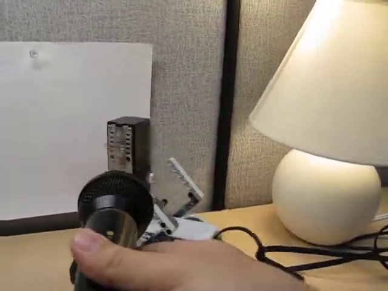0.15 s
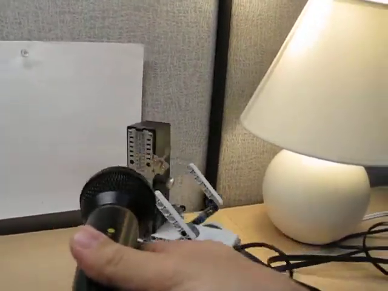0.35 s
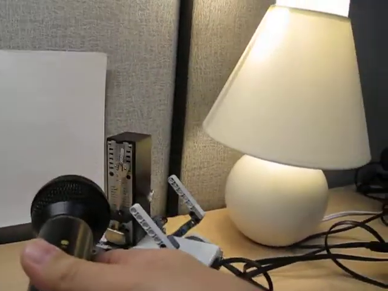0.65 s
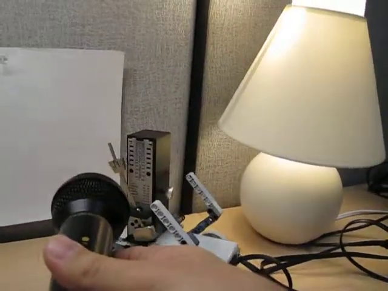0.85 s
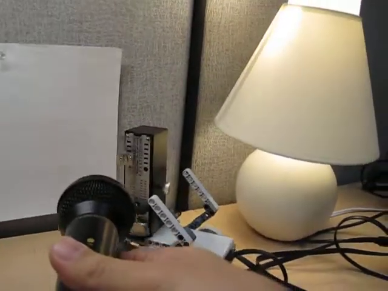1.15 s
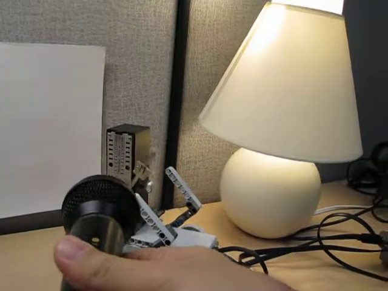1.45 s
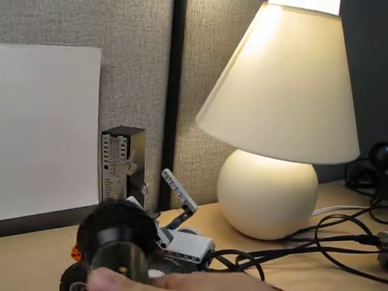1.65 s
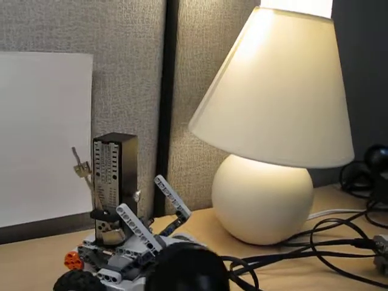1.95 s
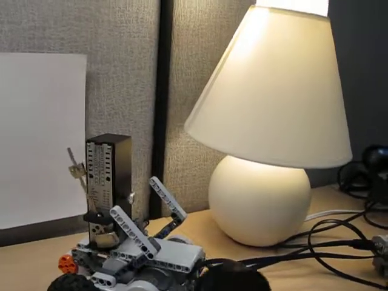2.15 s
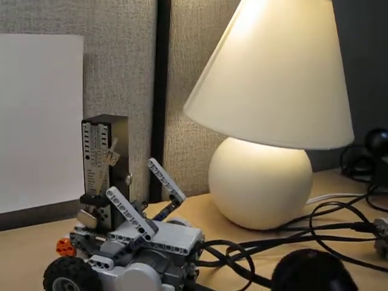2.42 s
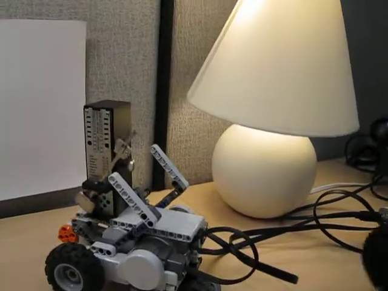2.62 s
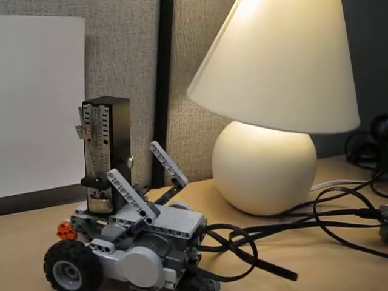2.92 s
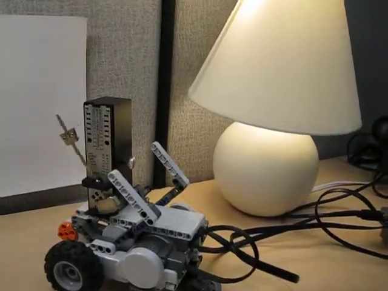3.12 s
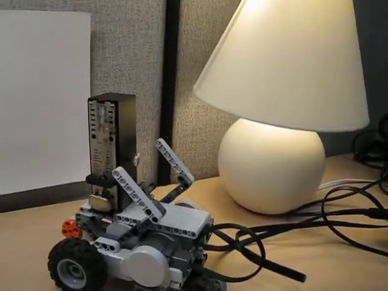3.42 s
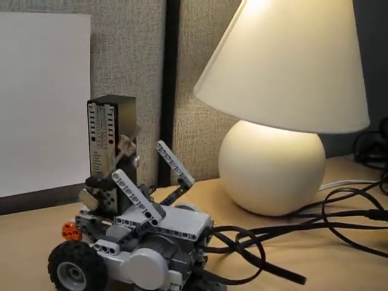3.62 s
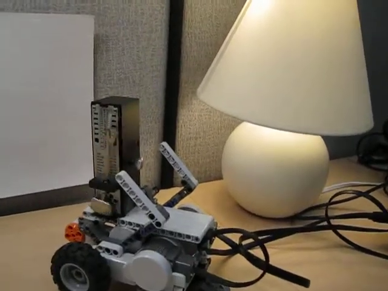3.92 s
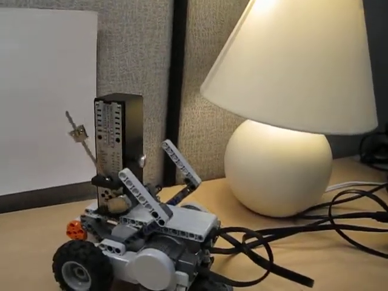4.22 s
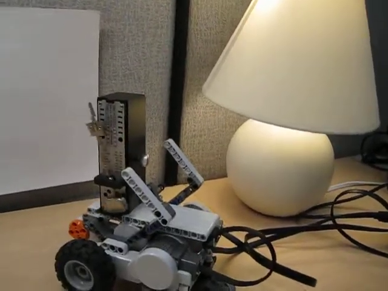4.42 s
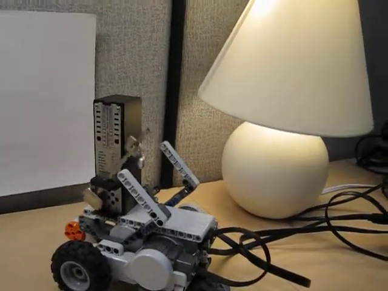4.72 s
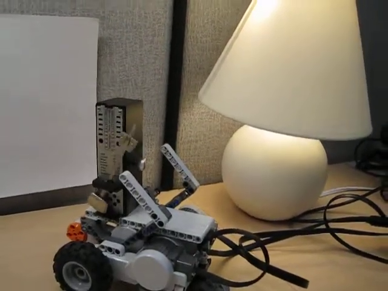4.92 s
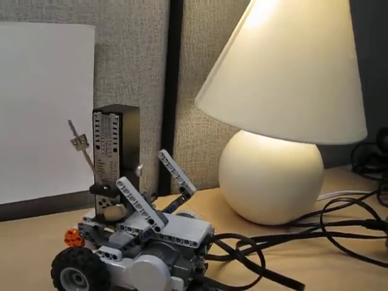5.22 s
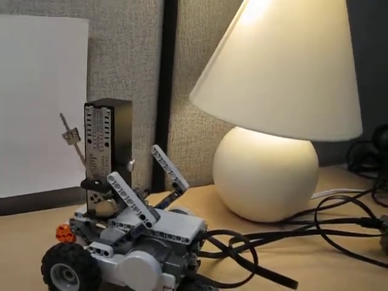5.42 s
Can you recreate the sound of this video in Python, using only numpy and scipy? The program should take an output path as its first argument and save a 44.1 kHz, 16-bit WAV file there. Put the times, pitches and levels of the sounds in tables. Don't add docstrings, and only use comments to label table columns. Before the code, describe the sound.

Small geared motors rattle harshly, slow and stop within a second, while a clockwork metronome keeps clicking evenly in a quiet office.

```python
import sys
import numpy as np
from scipy import signal
from scipy.fft import rfft, irfft
from scipy.io import wavfile
from scipy.ndimage import uniform_filter1d

SR = 44100
rng = np.random.default_rng(int(sys.argv[2]) if len(sys.argv) > 2 else 0)


def to_wav(sig):
    pcm = np.clip(np.atleast_2d(sig), -1, 1) * 32767
    pcm = np.round(pcm).astype(np.int16)
    wavfile.write(sys.argv[1], SR, pcm.T)


def convert_level_to_amplitude(level_db):
    exponent = np.asarray(level_db, float) / 20
    return 10 ** exponent


N = 245195


def evened(x):
    return x / np.sqrt(np.mean(x ** 2) + 1e-20)


def read(points, hz):
    f, value = np.transpose(points)
    return np.interp(np.log(hz + 1), np.log(f + 1), value)


def add(mix, s, sound):
    part = mix[round(s * SR):][:len(sound)]
    part += sound[:len(part)]


def coloured(x, points):
    gain = convert_level_to_amplitude(read(points, np.fft.rfftfreq(len(x), 1 / SR)))
    return irfft(rfft(x) * gain, len(x))


def resonate(x, hz, width):
    turn = np.exp(2j * np.pi * np.cumsum(hz * np.ones(len(x))) / SR)
    pole = np.exp(-np.pi * width / SR)
    return 2 * (turn * signal.lfilter([1 - pole], [1, -pole], x / turn)).real


def drift(size, smooth_s):
    span = max(round(smooth_s * SR), 1)
    once = uniform_filter1d(rng.standard_normal(size), span)
    return evened(uniform_filter1d(once, span))


# f/Hz, level/dB, t60/s, side of the wall (+-1)
CASE_MODES = [(847, -38.3, 0.0111, -1), (1160, -34.0, 0.0423, 1), (1268, -20.9, 0.0321, -1),
              (1357, -30.8, 0.0386, 1), (2030, -25.7, 0.0294, -1), (2170, -19.0, 0.0077, 1),
              (2403, -32.8, 0.0303, 1), (2472, -14.6, 0.014, 1), (2810, -16.8, 0.0094, 1),
              (3106, -17.4, 0.0122, -1), (3238, -20.4, 0.0111, -1), (3620, -11.2, 0.0068, -1),
              (3905, -27.3, 0.0203, -1), (4053, -27.0, 0.0084, 1), (4630, -34.0, 0.0328, 1),
              (4755, -22.7, 0.0174, -1), (5044, -32.9, 0.0309, 1), (5171, -26.3, 0.0127, 1),
              (5357, -12.1, 0.0108, 1), (5616, -21.7, 0.0111, -1), (5943, -17.8, 0.0088, -1),
              (6303, -23.3, 0.0063, 1), (7177, -24.0, 0.0119, 1), (8394, -35.6, 0.0185, -1),
              (9034, -23.3, 0.0072, 1), (9671, -33.3, 0.0111, 1), (11247, -39.1, 0.0125, 1),
              (12432, -39.2, 0.012, -1), (13630, -33.4, 0.0055, -1)]
# f/Hz, spectral level/dB per Hz
STEEL_SPECTRUM = [(700, -28), (1500, -20), (2200, -10), (5000, -3.5), (7000, -8), (10000, -11),
                  (13000, -15), (16000, -26.5)]
# f/Hz, spectral level/dB per Hz
SCATTER_SPECTRUM = [(600, -39), (1100, -16), (1290, 1), (1470, -12.5), (1800, -22.5), (2080, -3),
                    (2500, -7.5), (4300, -12), (5400, -13), (9000, -26.5), (16000, -41)]


def tick(strength_db, chatter_db, deck_db):
    t = np.arange(8000) / SR
    contact_s = .00048
    ring = sum(side * convert_level_to_amplitude(db - 60 * t / t60) * np.sin(2 * np.pi * hz * t)
               for hz, db, t60, side in CASE_MODES)
    ring = ring * (1 - np.exp(-t / contact_s))
    noise = rng.standard_normal((3, len(t)))
    rebounds = coloured(noise[0], [(1400, -9), (1900, 0)])
    rebounds = rebounds * (1 - np.exp(-t / .003)) * convert_level_to_amplitude(-60 * t / .022)
    wobble = signal.fftconvolve(rebounds, ring)[:len(t)] * convert_level_to_amplitude(-23.5)
    edge = evened(coloured(noise[1], STEEL_SPECTRUM))
    edge = edge * (1 - np.exp(-t / 0.00033)) * convert_level_to_amplitude(-26 - 60 * t / 0.034)
    two_decays = convert_level_to_amplitude(-36.0 - 60 * t / .09) + convert_level_to_amplitude(-59.5 - 60 * t / 0.22)
    scatter = evened(coloured(noise[2], SCATTER_SPECTRUM)) * (1 - np.exp(-t / 0.0019)) * two_decays
    plate_hz, plate_t60 = 2045, .055
    deck = -convert_level_to_amplitude(deck_db - 60 * t / plate_t60) * np.sin(2 * np.pi * plate_hz * t)
    deck = deck * (1 - np.exp(-t / 0.0049))
    return deck + convert_level_to_amplitude(strength_db) * (ring + scatter) + convert_level_to_amplitude(chatter_db) * (wobble + edge)


# t/s, strength level/dB, chatter level/dB, deck ring level/dB
STRIKES = [
    (0.2507, 0, -1.5, -42),
    (0.8033, 0.5, 1, -31.5),
    (1.3114, 1, -1, -38),
    (1.8905, 1, 0, -41),
    (2.3978, 0.5, 2, -45),
    (2.976, 0, 0.5, -40.5),
    (3.489, 0.5, -0.5, -38),
    (4.0644, 0.5, -1, -37.5),
    (4.5816, 0, 0.5, -36.5),
    (5.155, 0, 1, -24),
]


def metronome(mix):
    for s, *strike in STRIKES:
        add(mix, s, tick(*strike))


def gear_drive(speed):
    size = len(speed)
    teeth_per_s = 420 * speed
    loose = np.interp(speed, (.3, .8), (.3, .8))
    turns = np.cumsum(teeth_per_s * (1 + .2 * drift(size, smooth_s=0.0049))) / SR
    since = (turns % 1) / teeth_per_s
    tooth = (1 - np.exp(-since / 0.00022)) * np.exp(-since / 0.0014)
    tooth = tooth * convert_level_to_amplitude(3.8 * drift(size, smooth_s=0.0099))
    struck = rng.random(size) < 6000 / SR
    grit = convert_level_to_amplitude(2.1 * np.minimum(rng.exponential(1, size), 4)) * struck
    force = (1 - loose) * evened(tooth) + loose * evened(grit + 0.69)
    drive = rng.standard_normal(size) * force
    return drive / np.sqrt(uniform_filter1d(drive ** 2, 1500))


def housing(drive, peaks):
    rung = 0
    for hz, width, db in peaks:
        lean = convert_level_to_amplitude(db + 2.8 * drift(len(drive), smooth_s=0.011))
        rung = rung + lean * resonate(drive, hz, 0.33 * width + 70)
    return evened(rung)


# t/s, peak level/dB, ringing f/Hz
SLACK_JOLTS = [
    (.011, -20.5, 1560),
    (.033, -35, 2560),
    (.034, -47, 740),
    (0.046, -28, 1246),
    (0.09, -23, 2400),
    (.127, -33, 729),
]


def jolts(out):
    t = np.arange(1200) / SR
    for s, peak_db, hz in SLACK_JOLTS:
        ring = convert_level_to_amplitude(peak_db - 60 * t / 0.029) * np.sin(2 * np.pi * hz * t)
        add(out, s, ring * (1 - np.exp(-t / 0.0024)))


# t/s, level/dB
GEAR_LOAD = [(0, -37), (.045, -31.5), (.082, -42), (.096, -35), (.14, -36.5), (.31, -41), (.43, -40.5),
             (.525, -47), (.63, -65.5)]
# f/Hz, width/Hz, level/dB
PULLING_PEAKS = [(1560, 92, -11), (2528, 100, 1), (3980, 160, -3), (4284, 92, 7.5), (4690, 31, -15),
                 (6250, 410, -5), (8150, 45, -15.5), (8920, 29, -16), (10450, 180, 0), (11400, 92, -17.5)]
# f/Hz, width/Hz, level/dB
BRAKING_PEAKS = [(2400, 24, -6), (2874, 43, -3), (4190, 51, -1.5), (4560, 47, -1), (4820, 96, 4),
                 (5790, 53, -7), (6250, 120, 0.5), (6920, 48, 0.5), (9780, 130, -18), (10280, 230, -4)]
# f/Hz, width/Hz, level/dB
COASTING_PEAKS = [(1500, 54, 3.5), (2080, 74, -7.5), (2670, 180, -8), (2990, 70, -11), (4010, 120, -1),
                  (4356, 70, 2.5), (5450, 78, -11), (6320, 130, -7.5), (6970, 220, -44), (9730, 300, -12)]
# f/Hz, spectral level/dB per Hz
SHELL_SPECTRUM = [(400, -44), (720, -4), (1060, -26.5), (1490, 2), (1750, -7.5), (2500, -9), (3400, -5.5),
                  (4300, -5.5), (7200, -8.5), (8800, -11.5), (10300, -7), (11100, -24), (12700, -29),
                  (15800, -31)]
# chassis level/dB, wheel frame level/dB, bearing hiss level/dB
PART_LEVELS = [
    (-9, -4, -8),
    (-6.5, -6, -6.5),
    (-9.5, -5, -8),
]


def motors():
    t = np.arange(round(.7 * SR)) / SR
    gearbox_db = np.interp(t, *np.transpose(GEAR_LOAD))
    standstill_s = .68
    speed = np.maximum(1 - (t / standstill_s) ** 2.5, .1)
    stage = np.interp(t, (.075, .095, .23, .33), (0, 1, 1, 2))
    drive = gear_drive(speed)
    rung = 0
    for k, peaks in enumerate((PULLING_PEAKS, BRAKING_PEAKS, COASTING_PEAKS)):
        share = np.clip(1 - abs(stage - k), 0, 1)
        rung = rung + np.sqrt(share) * housing(drive, peaks)
    whole = rung + convert_level_to_amplitude(-3) * evened(coloured(drive, SHELL_SPECTRUM))
    below = [coloured(whole, [(.95 * hz, 0), (1.15 * hz, -40)]) for hz in (1900, 3400, 8300)]
    chassis, frame, gearbox, hiss = map(evened, np.diff([0 * t, *below, whole], axis=0))
    out = gearbox
    for part, stage_db, rest_db in zip((chassis, frame, hiss), np.transpose(PART_LEVELS), (10, 2, -11)):
        part_db = np.interp(stage, np.arange(3), stage_db) + rest_db * (1 - speed) ** 2
        out = out + convert_level_to_amplitude(part_db) * part
    out = convert_level_to_amplitude(gearbox_db) * out
    jolts(out)
    out = coloured(out, [(700, -6), (1000, -1), (1250, -1.5), (12600, 1.0), (13400, -3.0), (15800, -10.5)])
    return out * np.clip((.635 - t) / 0.035, 0, 1)


# (f/Hz, level/dB)
REVERBERATION = (-18, 0.47, [(1000, 2), (4000, -2.5), (9000, -13)])


def room(x):
    wet_db, t60, colour = REVERBERATION
    t = np.arange(SR // 2) / SR
    tail = coloured(rng.standard_normal(len(t)), colour) * convert_level_to_amplitude(-60 * t / t60)
    return convert_level_to_amplitude(wet_db) * signal.fftconvolve(x, tail / np.linalg.norm(tail))


def knock(peak_db, t60, hz, bright_db):
    t = np.arange(6000) / SR
    burst = rng.standard_normal(len(t))
    width = 1.5 * hz
    body = evened(resonate(resonate(burst, hz, width), hz, width))
    edge = evened(resonate(resonate(burst, 4500, 5500), 5200, 6000))
    edge = convert_level_to_amplitude(bright_db - 60 * t / 0.11) * edge
    return convert_level_to_amplitude(peak_db - 6 - 60 * t / t60) * (1 - np.exp(-t / 0.00054)) * (body + edge)


# t/s, peak level/dB, t60/s, centre f/Hz, brightness level/dB
FAR_KNOCKS = [
    (0.653, -55, 0.037, 600, -25),
    (0.690, -57, 0.04, 3300, -11),
    (.772, -59, .04, 3500, -6),
    (1.7094, -45, 0.11, 1600, -2.5),
    (4.0276, -42.5, 0.046, 1350, -25),
    (4.042, -50, .03, 750, -25),
]


def far_knocks(mix):
    for s, *blow in FAR_KNOCKS:
        add(mix, s, knock(*blow))


# t/s, peak level/dB, f/Hz, length/s
DESK_THUMPS = [
    (.645, -50.5, 227, 0.031),
    (.714, -61, 4100, .009),
    (.74, -55.5, 211.5, 0.048),
    (.88, -54.5, 212, 0.055),
    (1.035, -56.5, 243, 0.045),
]


def desk(mix):
    for s, peak_db, hz, length in DESK_THUMPS:
        t = np.arange(round(length * SR)) / SR
        swell = np.sin(np.pi * t / length) ** 2
        add(mix, s, convert_level_to_amplitude(peak_db) * swell * np.sin(2 * np.pi * hz * t))


def idle_whine():
    t = np.arange(N) / SR
    spread_s = 0.27
    pitch_surge = np.exp(-((t - 1.6) / spread_s) ** 2)
    level_surge = np.exp(-((t - 1.45) / spread_s) ** 2)
    turns = np.cumsum(4962 + 74 * pitch_surge + 10 * drift(N, smooth_s=.02)) / SR
    return convert_level_to_amplitude(-84 + 5 * level_surge) * (t > 0.4) * np.sin(2 * np.pi * turns)


def fans():
    t = np.arange(N) / SR
    beats_per_s, quiet_s = .72, 1.33
    turns = np.cumsum(109.9 + .5 * drift(N, smooth_s=.05)) / SR
    pair = convert_level_to_amplitude(-63.5) - convert_level_to_amplitude(-65.5) * np.exp(2j * np.pi * beats_per_s * (t - quiet_s))
    hum = (pair * np.exp(2j * np.pi * turns)).real
    hum = np.sqrt(2) * convert_level_to_amplitude(0.86 * drift(N, smooth_s=0.093)) * hum
    blade_turns = np.cumsum(599 + 3 * drift(N, smooth_s=.05)) / SR
    return hum + convert_level_to_amplitude(-76.5) * np.sin(2 * np.pi * blade_turns)


# f/Hz, width/Hz, level/dB
DUCT_DRONES = [(60.4, 17, -64.5), (21.6, 4.2, -64.5)]


def ducts():
    out = np.zeros(N)
    for hz, width, db in DUCT_DRONES:
        flow = rng.standard_normal(N)
        out += convert_level_to_amplitude(db) * evened(resonate(resonate(flow, hz, width), hz, width))
    return out


# f/Hz, spectral level/dB per Hz
AIR_SPECTRUM = [(10, -23), (22, -6), (30, -18), (40, -4), (50, -11), (65, -10), (82, -16), (115, -8),
                (141, -17.5), (262, -19), (500, -24), (1100, -28), (9100, -42.5), (15800, -49.5)]


def air():
    frames, hz = N // 512 + 5, np.fft.rfftfreq(2048, 1 / SR)
    a, b, patches = rng.standard_normal((frames, 1025, 3)).T
    patches = evened(uniform_filter1d(uniform_filter1d(patches, 20, 0), 8, 1))
    z = (a + 1j * b) * convert_level_to_amplitude(read(AIR_SPECTRUM, hz)[:, None] + .6 * patches)
    rush = signal.istft(z, nperseg=2048, noverlap=1536)[1][:N]
    return convert_level_to_amplitude(-58) * evened(rush)


def scene():
    mix = air() + ducts() + fans() + idle_whine()
    metronome(mix)
    gears = motors()
    add(mix, 0, gears)
    add(mix, .01, room(gears))
    far_knocks(mix)
    desk(mix)
    return mix[None]


def top_cut(x):
    return signal.sosfilt(signal.butter(12, 16800, fs=SR, output="sos"), x)


def record(dry):
    lowpass = signal.firwin(255, 15850, window=("kaiser", 6), fs=SR)
    mix = signal.oaconvolve(dry, lowpass[None], "same")
    return top_cut(mix)


dry = scene()
out = record(dry)
to_wav(out)
```